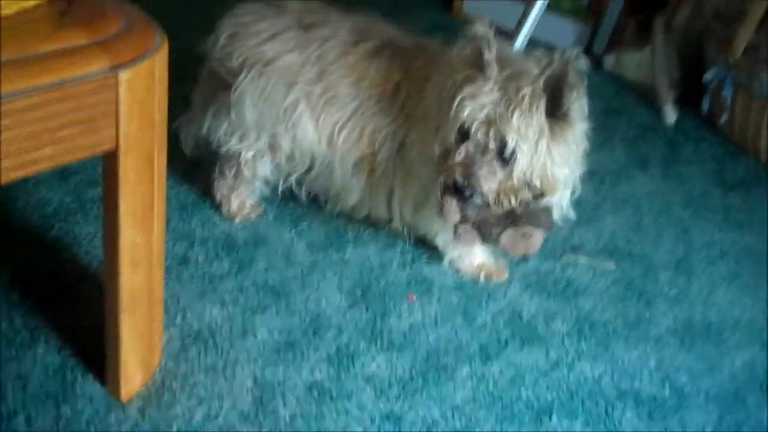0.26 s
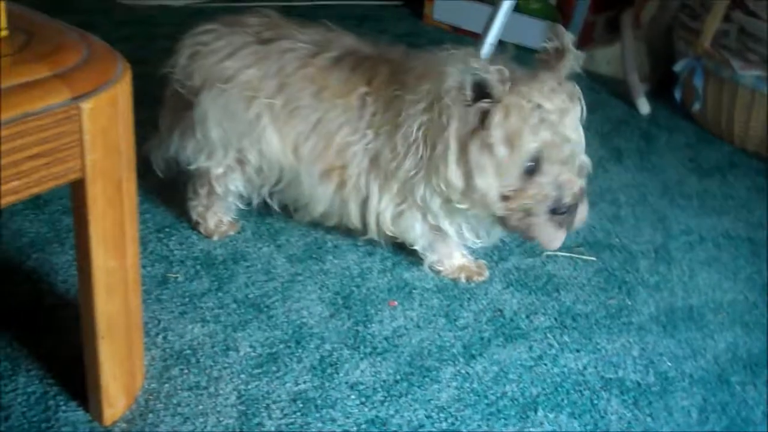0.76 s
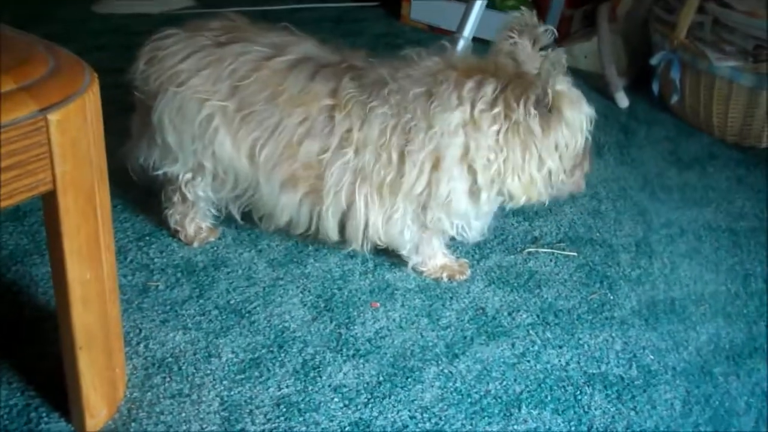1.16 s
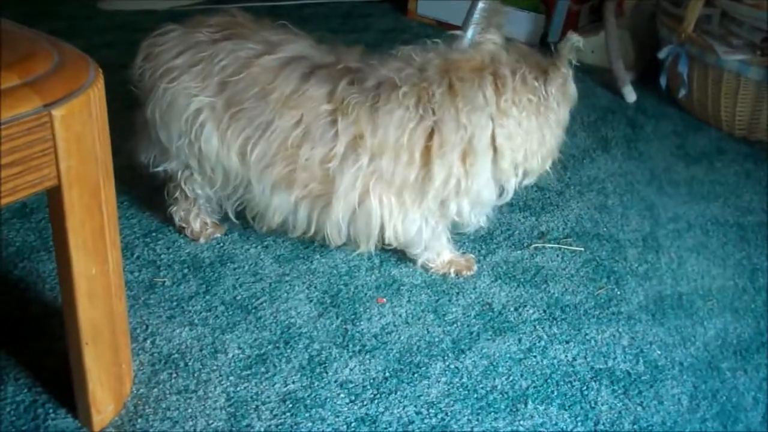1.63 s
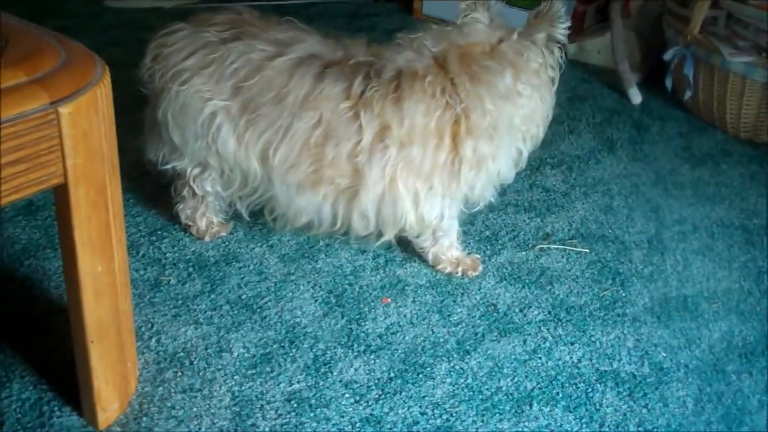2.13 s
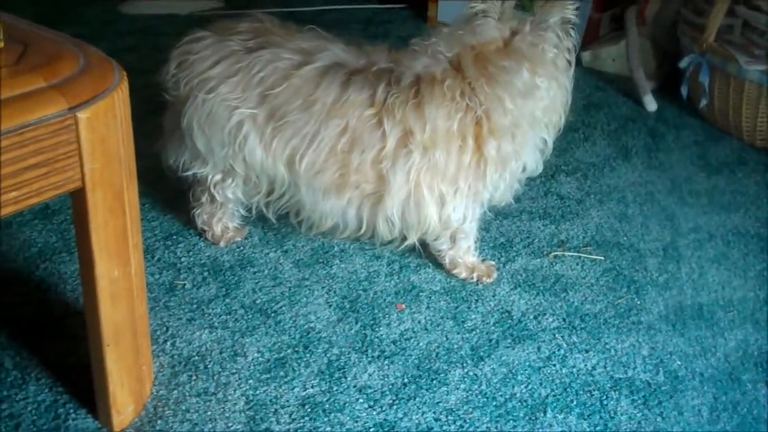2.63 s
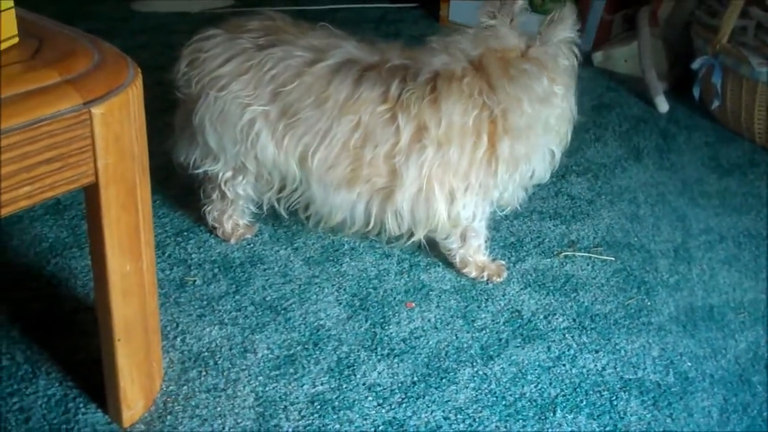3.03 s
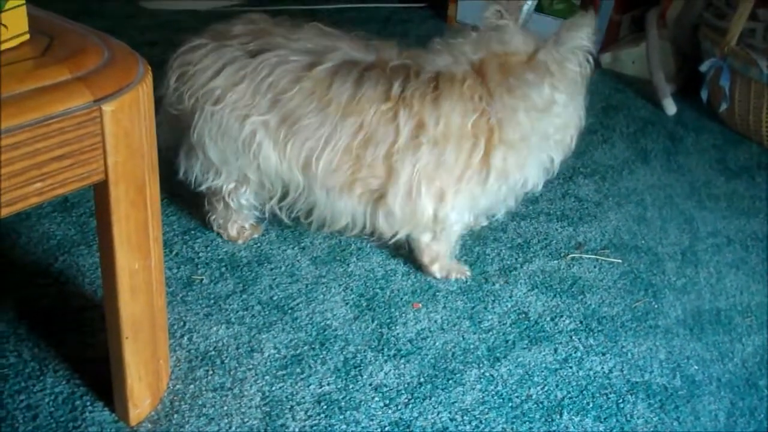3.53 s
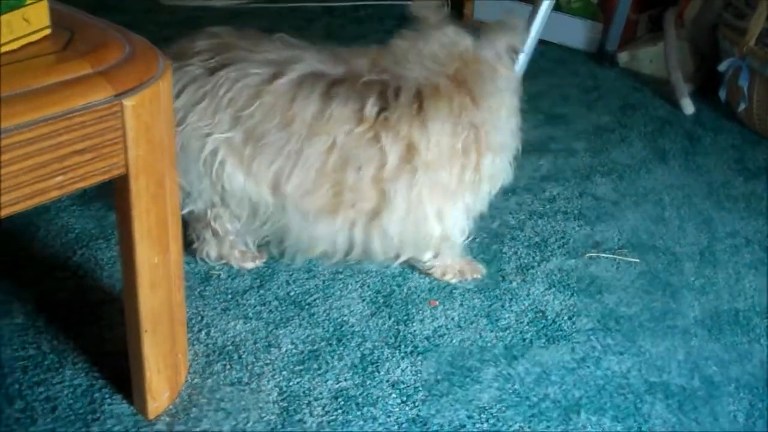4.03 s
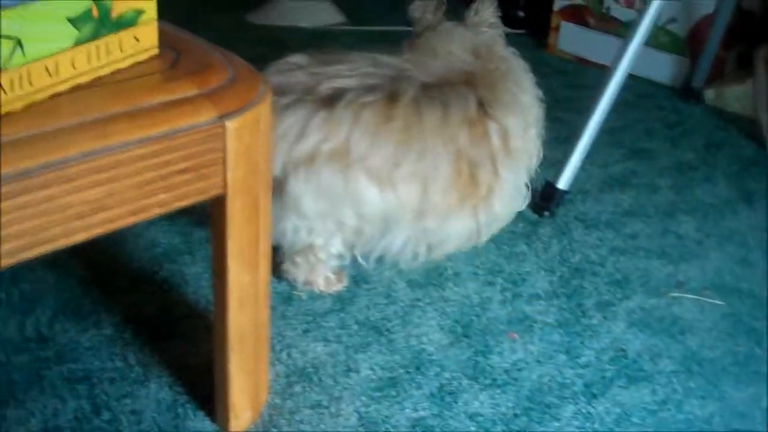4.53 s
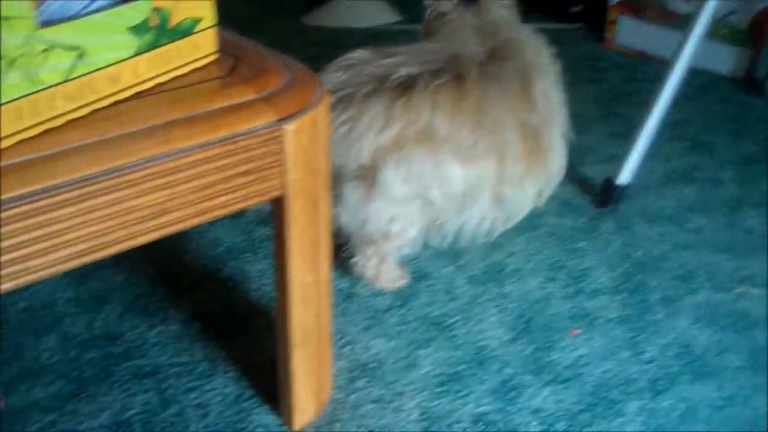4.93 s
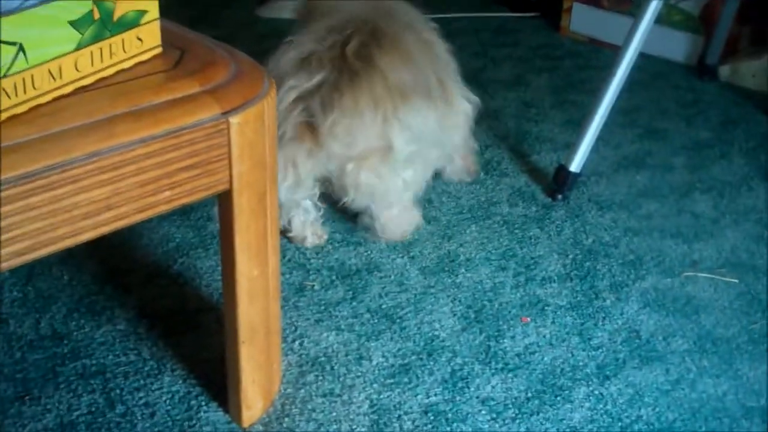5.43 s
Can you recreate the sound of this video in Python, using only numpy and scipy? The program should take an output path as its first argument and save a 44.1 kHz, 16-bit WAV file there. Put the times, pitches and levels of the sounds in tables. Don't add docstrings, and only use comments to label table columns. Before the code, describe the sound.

Close, high whines from a small dog slide and break into low little grunts, amid nasal breaths, faint hiss and late paw bumps.

```python
import sys
import numpy as np
from scipy import signal
from scipy.fft import rfft, irfft, next_fast_len
from scipy.io import wavfile
from scipy.ndimage import uniform_filter1d, map_coordinates

SR = 44100
rng = np.random.default_rng(int(sys.argv[2]) if len(sys.argv) > 2 else 0)


def magnitude_from_level(level_db):
    exponent = np.asarray(level_db, float) / 20
    return 10 ** exponent


def transcribe(u):
    v = np.clip(np.atleast_2d(u).T, -1, 1)
    q = np.round(v * 32767).astype(np.int16)
    wavfile.write(sys.argv[1], SR, q)


N = 250916


def unit(x):
    return x / np.sqrt(np.mean(x ** 2) + 1e-20)


def along(points, hz, axis=1):
    p = np.transpose(points)
    return np.interp(np.log(hz + 1), np.log(p[0] + 1), p[axis])


def curves(rows):
    s, *cols = np.transpose(rows)
    return [np.interp(np.arange(N) / SR, s, c) for c in cols]


def wobble(rate):
    knots = rng.standard_normal(int(N * rate / SR) + 4)
    return map_coordinates(knots, [np.arange(N) * rate / SR])


def filtered(x, response):
    m = next_fast_len(x.shape[-1] + SR // 4)
    spectrum = rfft(x, m) * response(np.fft.rfftfreq(m, 1 / SR))
    return irfft(spectrum, m)[..., :x.shape[-1]]


def leaning(x, lean):
    return filtered(x, lambda hz: magnitude_from_level(along(lean, hz) * np.array([[.5], [-.5]])))


def hiss():
    # (frequency [Hz], density [dB per Hz])
    hiss_colour = [(15, -40), (25, -4.5), (70, -4), (202, -7.5), (511, -5), (1100, -6.5), (3630, -10.5),
                   (14000, -17)]
    # (frequency [Hz], level [dB])
    hiss_lean = [(60, -2.5), (180, 6.5), (540, 5.5), (1630, 5), (4910, 2.0), (14800, 0.5)]
    noise = unit(filtered(rng.standard_normal((2, N)), lambda hz: magnitude_from_level(along(hiss_colour, hz))))
    return magnitude_from_level(-63.5 + 3.5) * leaning(noise, hiss_lean)


def pair(size):
    # (frequency [Hz], likeness [0-1])
    likeness = [(300, 1), (900, 0.88), (1800, 0.55), (3500, 0.12), (10000, 0.044)]

    def spread(hz):
        angle = np.arccos(np.clip(along(likeness, hz), 0, 1)) / 2
        return np.array([np.cos(angle), np.sin(angle)])

    mid, side = filtered(rng.standard_normal((2, size)), spread)
    return np.array([mid + side, mid - side])


def resonances(modes, f):
    power = sum(magnitude_from_level(2 * db) * (f * w) ** 2 / ((c * c - f * f) ** 2 + (f * w) ** 2) for c, w, db in modes)
    return np.sqrt(power / (1 + (f / 9500) ** 8))


def by_posture(layer):
    # (centre [Hz], width [Hz], level [dB])
    nose = [
        [(400, 70, -10), (990, 530, -3.5), (2160, 230, -5.5), (3190, 190, -3), (4170, 120, -1.5),
         (5280, 340, 0.5), (6900, 840, -0.5), (8410, 92, 5.5), (9400, 340, -7)],
        [(400, 81, -7.5), (1102, 380, -5), (2270, 310, -9), (3480, 212, 1.5), (4160, 360, -4),
         (5200, 450, -0.5), (6640, 490, 4.5), (7530, 530, -3), (8036, 230, -6.5)],
        [(400, 160, -11), (1020, 290, -4), (2430, 340, -10.5), (3645, 550, -1.5), (4640, 190, -7),
         (5570, 475, 4), (6950, 530, 3.5), (7640, 450, -10.5), (8570, 150, -3)],
    ]
    head_turns = [.56, 2.0]
    posture = np.searchsorted(head_turns, np.arange(N) / SR)
    return sum((posture == i) * layer(modes) for i, modes in enumerate(nose))


def airflow():
    # (start [s], full [s], end [s], level [dB], fade [s])
    breaths = [(-.35, .25, 0.434, -43.5, 0.013), (0.616, 0.698, 0.92, -46.5, 0.055),
               (1.167, 1.277, 1.465, -48, 0.21), (2.28, 2.496, 2.71, -51, .12),
               (2.928, 3.025, 3.088, -47.5, .1), (3.362, 3.453, 3.65, -48.5, 0.086),
               (4.206, 4.34, 4.65, -51.5, 0.048)]
    # (time [s], level [dB])
    puffs = [(.452, -53), (1.6, -44.5), (2.666, -50), (3.085, -52), (3.708, -44), (4.47, -50.5)]
    faint_db, linger_s, puff_s = -66, .25, 0.012
    t = np.arange(N) / SR
    flow = np.zeros(N)
    for s, full, end, db, fade in breaths:
        times = [s - .1, s, full, end, end + fade, end + fade + linger_s]
        levels = [-100, faint_db, db, db, faint_db, -80]
        flow += magnitude_from_level(np.interp(t, times, levels, right=-120))
    for s, db in puffs:
        flow += magnitude_from_level(db) * np.exp(-.5 * ((t - s) / puff_s) ** 2)
    return flow


def breath(gate, phase, pulsed=0.1, flutter_db=2.5):
    turbulence = pair(N)
    air = by_posture(lambda modes: unit(filtered(turbulence, lambda hz: resonances(modes, hz))))
    flow = airflow() * magnitude_from_level(-5.5 + flutter_db * wobble(30.044))
    return flow * (1 + pulsed * gate * np.cos(phase)) * air


def whine(high, colour, timbre, grunt):
    # (2nd partial, 3rd partial, overtones [dB re its level], unsteadiness [0-1])
    chest = (-17, -36.5, -26, 0.24)
    follow = (0.77, 0.54, 0.5)
    usual_db, calm = -44, .3
    dip_at, dip_db, break_share = .42, 5, .65
    break_dull_db, break_waver = 11, 0.82
    rise_share, rise_db, droop_db = 0.29, 8, 2
    knee_s, knee_db, stop_s, stop_db = 0.0078, 8, .02, 49

    lands, hz, db, held, last_hz = grunt
    s, top_hz, top_db = high[-1]
    middle = (high[0][0] + s) / 2
    dip_s = s + dip_at * (lands - s)
    dip_hz = top_hz + break_share * (hz - top_hz)
    dip = (dip_s, dip_hz, min(top_db, db) - dip_db)

    head = []
    for p in [*high, dip]:
        followed = np.add(colour[:3], np.multiply(follow, p[2] - usual_db))
        partials = followed + np.multiply(timbre[2:], p[0] - middle)
        head.append((*p, *partials, colour[3] * magnitude_from_level(calm * (usual_db - p[2]))))
    head[-1] = (*head[-1][:4], head[-1][4] - break_dull_db, head[-1][5], break_waver)

    ends = lands + max(held, .001)
    low = [(lands, hz, db - rise_db),
           (lands + rise_share * (ends - lands), hz, db),
           (ends, last_hz, db - droop_db),
           (ends + knee_s, last_hz, db - knee_db),
           (ends + stop_s, last_hz, db - stop_db)]
    return head + [(*p, *np.add(chest[:3], p[2]), chest[3]) for p in low]


def whimper():
    # (time [s], pitch [Hz], level [dB])
    rising = [(0, 487.4, -54), (0.107, 519.3, -48), (.2, 588.6, -42.5), (0.224, 645, -40.5),
              (.25, 689.7, -47.5), (.31, 731, -37), (0.371, 699.5, -51), (0.41, 683.6, -43)]
    brief = [(.7, 935, -67), (.736, 883.1, -57), (.748, 835.3, -36.5), (.765, 799.4, -39),
             (.8, 825.3, -41.5), (0.846, 833.6, -39.5), (0.902, 818.3, -60), (.935, 834.6, -60)]
    falling = [(1.275, 887, -56), (1.29, 850, -40.5), (1.321, 782.7, -37.5), (1.37, 777.7, -44),
               (1.408, 712, -48), (1.438, 700.6, -42), (1.464, 677.7, -46), (1.5, 678, -52),
               (1.552, 656, -44.5)]
    gulp = [(2.266, 400, -77.5)]
    steady = [(2.37, 718, -60), (2.401, 745, -50.5), (2.454, 832, -41.5), (2.52, 847.7, -37.5),
              (2.56, 861, -34), (2.6, 859.5, -33.5), (2.63, 858.4, -33), (2.653, 847, -33),
              (2.666, 826, -40)]
    yelp = [(2.991, 1082, -52.5), (3.008, 1056, -36.5), (3.03, 1065, -49.5), (3.05, 1058, -33.5),
            (3.058, 1018, -37), (3.066, 966.3, -41)]
    shaky = [(3.427, 816, -55.5), (3.465, 741, -48), (3.495, 797.3, -49.5), (3.537, 763.5, -49.5),
             (3.556, 687, -50), (3.574, 748.4, -63.5), (3.6, 773, -48), (3.669, 821, -42),
             (3.692, 807.5, -43)]
    final = [(4.304, 838, -61.5), (4.311, 826, -49), (4.345, 797, -49.5), (4.365, 828.7, -42),
             (4.385, 823.6, -63), (4.41, 815, -43.5), (4.418, 790, -47)]
    # (2nd partial [dB], 3rd partial [dB], overtones [dB], unsteadiness [0-1])
    colours = [(-48, -60, -50.5, 0.43), (-48.5, -56.5, -47, 0.16), (-53, -58, -51, 0.25),
               (-70, -78, -66, .16), (-59.5, -56.5, -53.5, 0.15), (-58, -59.5, -47, .24),
               (-48, -59, -53.5, .45), (-54, -64, -53.5, 0.7)]
    # (tilt [dB/octave], even over odd [dB], drift of 2nd, of 3rd, of overtones [dB/s])
    timbres = [(-7, -6.8, -12, 14, 13), (0.5, 8, -4, 41, 8), (1, -1.5, 16, -31.5, 13),
               (2, 0.1, 0.1, -4.5, -4.5), (1.5, -0.5, 4, -7, -2), (-7, 5.5, 80, 54, 33),
               (1.5, 0.5, -21, -3, -6), (1.5, -5, 38, 56, 13)]
    # (landing [s], pitch [Hz], level [dB], hold [s], last pitch [Hz])
    grunts = [(.455, 433.3, -52, .001, 430), (.946, 405.7, -53.5, 0.001096, 403),
              (1.574, 427.8, -29.5, 0.0278, 390.2), (2.284, 394, -48, .014, 414),
              (2.688, 442.4, -35, 0.0078, 429.4), (3.084, 442, -32, 0.0079, 426.5),
              (3.704, 452, -35.5, .008, 433.3), (4.443, 440.7, -30.5, .131, 420)]
    highs = [rising, brief, falling, gulp, steady, yelp, shaky, final]
    whines = [whine(*parts) for parts in zip(highs, colours, timbres, grunts)]
    return whines, np.transpose(timbres)[:2]


def voice(jitter=0.014, shimmer_db=4, scatter_db=4.5, overtone_db=-7):
    # (frequency [Hz], level [dB])
    throat = [(800, -7.5), (1000, 8), (1250, 6), (1450, -1.5), (1750, -17), (2150, 3), (2550, -2),
              (3200, -2)]
    # (frequency [Hz], level [dB])
    tract = [(1900, 5), (2700, 6), (3500, -3.5), (5000, -3.5), (7000, -2), (9000, -3.5), (12000, 2)]
    whines, balance = whimper()
    pitch, *low_db, top_db, unsteady = curves(np.vstack(whines))
    unsteady = np.clip(unsteady, 0, 1)
    t = np.arange(N) / SR
    gate = sum((t >= w[0][0]) & (t < w[-1][0]) for w in whines) > 0
    gate = uniform_filter1d(gate * 1., 240)
    shaken_pitch = pitch * (1 + jitter * np.sqrt(unsteady) * wobble(60))
    phase = 2 * np.pi * np.cumsum(shaken_pitch) / SR

    x = np.zeros(N)
    for k, db in enumerate(low_db):
        throat_db = (k > 0) * along(throat, (k + 1) * pitch)
        shimmer = (shimmer_db * unsteady + 0.16 * k) * wobble(50)
        x += magnitude_from_level(db + throat_db + shimmer) * np.sin((k + 1) * phase)

    top_db = top_db + overtone_db + 2 * np.minimum(0, low_db[0] + 57)
    slide = uniform_filter1d(np.abs(np.gradient(np.log(pitch))) * SR, 200)
    top_db = top_db - 0.5 * slide
    tilt_db, even_db = balance[:, np.searchsorted([w[0][0] for w in whines[1:]], t)]
    for k in range(4, 19):
        hz = k * pitch
        colour_db = along(tract, hz) + tilt_db * np.log2(hz / 5000) + even_db * (.5 - k % 2)
        nasal = by_posture(lambda modes: resonances(modes, hz) ** 1.165)
        x += magnitude_from_level(top_db + scatter_db * wobble(12) + colour_db) * nasal * np.sin(k * phase + k * k)
    return np.sqrt(2) * gate * x, gate, phase


def knocks():
    # (time [s], peak [dB], thud over scuff [dB], length [s])
    contacts = [(3.903, -49.5, -16, 0.089), (4.958, -49, -14, .02), (5.018, -35, -11, 0.074),
                (5.024, -40, 1.5, 0.1), (5.046, -41.5, -7, 0.2), (5.191, -33.5, -6, 0.051)]
    # (frequency [Hz], density [dB per Hz])
    rustle = [(710, -31), (1200, -11), (1620, 1), (1960, -5), (3280, -3.5), (3590, -9), (6030, 3),
              (13000, -24)]
    # (frequency [Hz], density [dB per Hz])
    thump = [(88, -44), (150, -14), (348, 6), (562, 7), (1210, -4), (1800, -16), (2340, -35), (3960, -120)]
    out, t = np.zeros((2, N + SR)), np.arange(SR // 3) / SR
    for s, db, thud_db, t60 in contacts:
        scuff = unit(filtered(pair(len(t)), lambda hz: magnitude_from_level(along(rustle, hz))))
        thud = unit(filtered(pair(len(t)), lambda hz: magnitude_from_level(along(thump, hz))))
        decay = magnitude_from_level(db - 5.5 - 60 * t / max(t60, .005))
        attack = 1 - np.exp(-t / 0.00086)
        out[:, round(s * SR):][:, :len(t)] += decay * attack * (scuff + magnitude_from_level(thud_db) * thud)
    return out[:, :N]


def room(x, gap=.004):
    # (frequency [Hz], t60 [s], level [dB])
    walls = [(200, 0.23, 3), (420, 0.38, -12), (850, 0.41, -2.5), (1190, 0.27, -0.5), (2480, 0.31, -3),
             (8000, 0.24, -3)]
    hz, t, z = signal.stft(pair(SR // 2), SR, nperseg=256)
    t60 = along(walls, hz)[:, None]
    even_energy = np.sqrt(6 * np.log(10) / (t60 * SR))
    fade = magnitude_from_level(along(walls, hz, axis=2)[:, None] - 60 * t / t60) * even_energy
    tail = signal.istft(z * fade, SR, nperseg=256)[1]
    tail = np.pad(tail, ((0, 0), (round(gap * SR), 0)))
    return x + signal.fftconvolve(x, tail, axes=1)[:, :N]


def scene():
    # (frequency [Hz], level [dB])
    dog_lean = [(300, -0.5), (1000, .5), (2400, -0.5), (4400, -1.5), (6000, -6.5), (8200, 13.5), (11000, 7)]
    tone, gate, phase = voice()
    tones = np.array([np.roll(tone, 2), tone])
    dog = leaning(tones + breath(gate, phase), dog_lean)
    return room(dog + knocks()) + hiss()


def low_pass(x):
    return signal.sosfilt(signal.butter(12, 15380, fs=SR, output="sos"), x)


def record(dry):
    top_hz = 14230
    mix = filtered(dry, lambda hz: hz < top_hz)
    return low_pass(mix)


dry = scene()
out = record(dry)
transcribe(out)
```